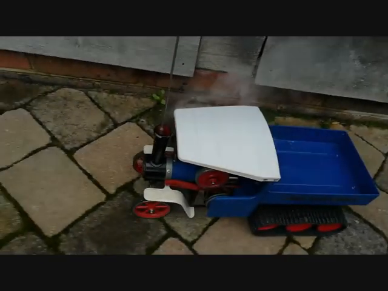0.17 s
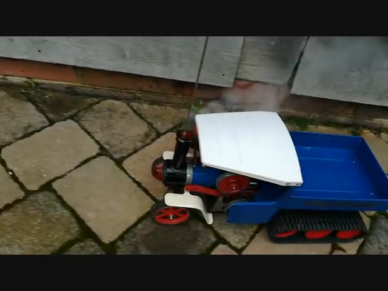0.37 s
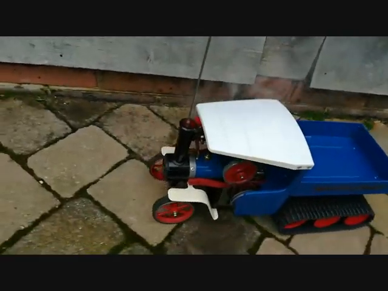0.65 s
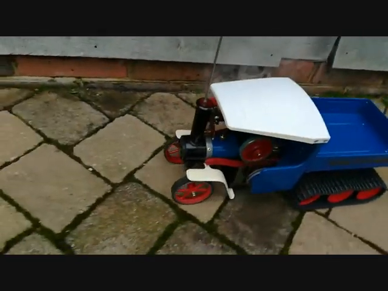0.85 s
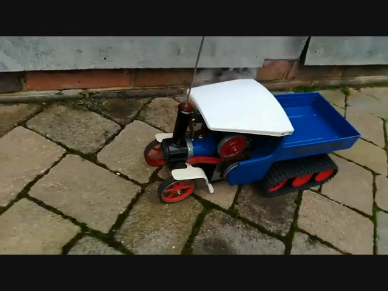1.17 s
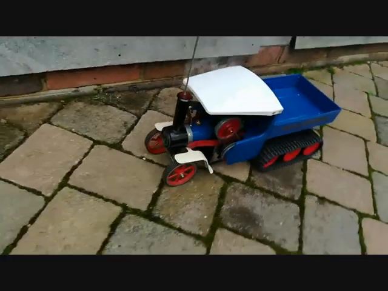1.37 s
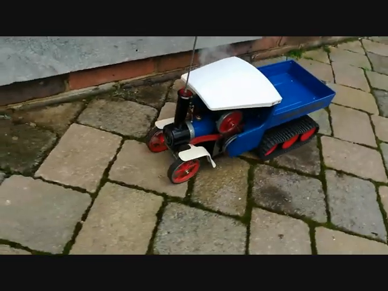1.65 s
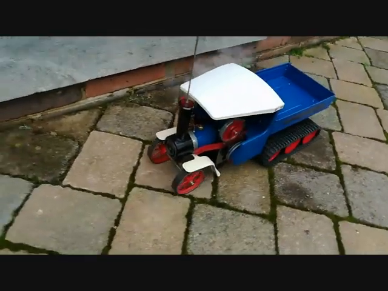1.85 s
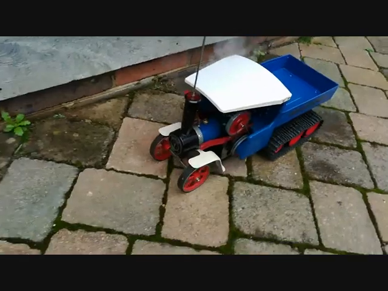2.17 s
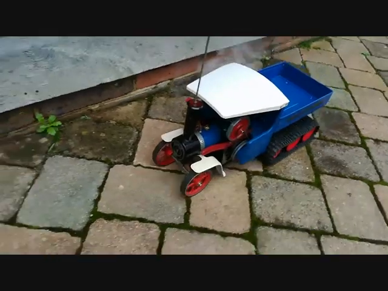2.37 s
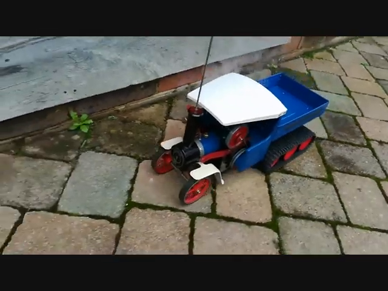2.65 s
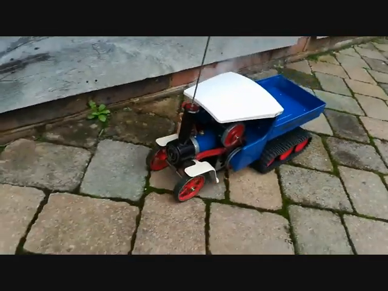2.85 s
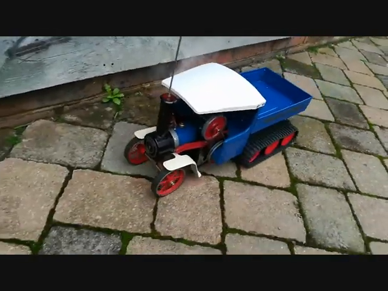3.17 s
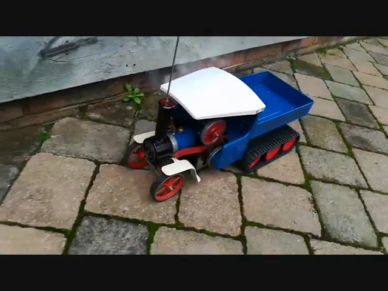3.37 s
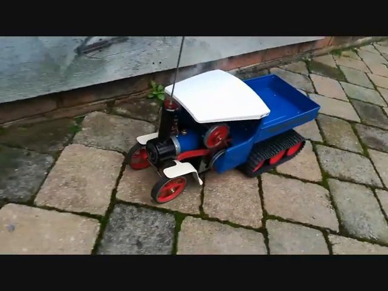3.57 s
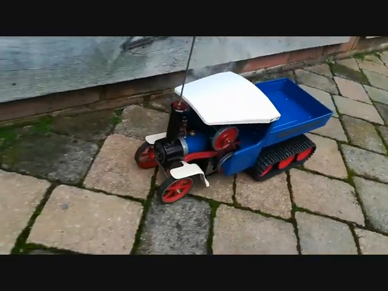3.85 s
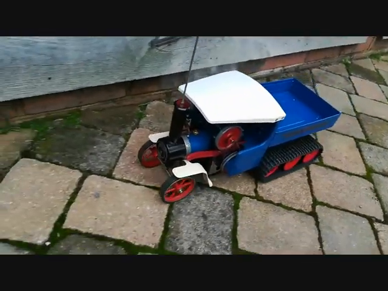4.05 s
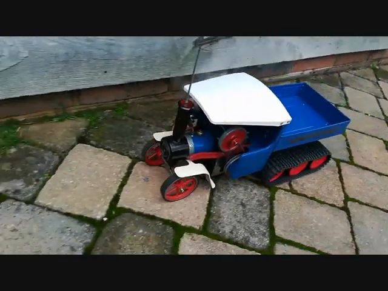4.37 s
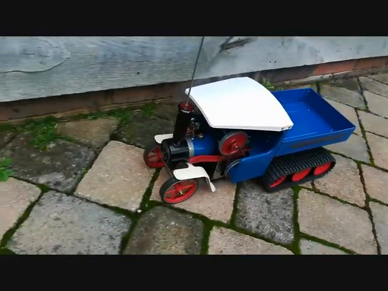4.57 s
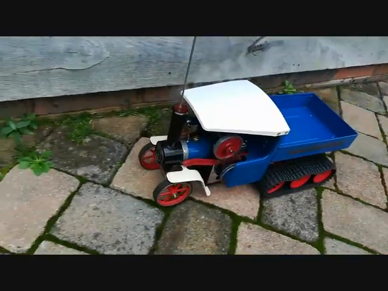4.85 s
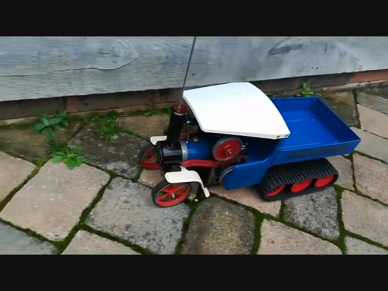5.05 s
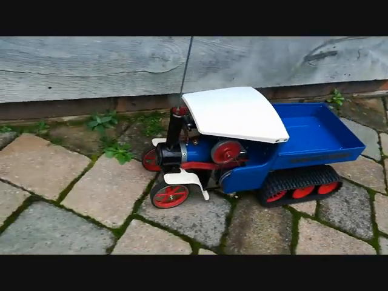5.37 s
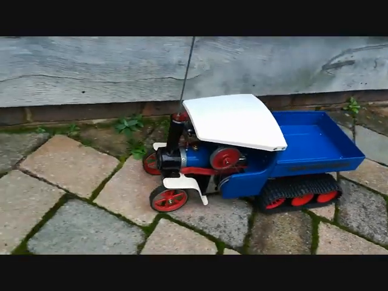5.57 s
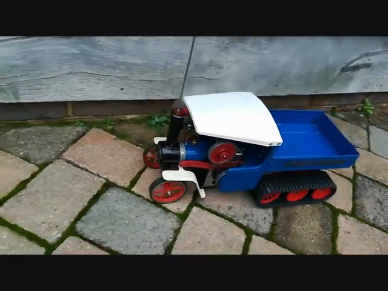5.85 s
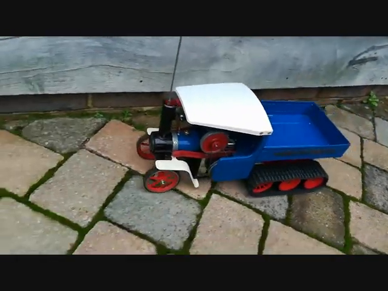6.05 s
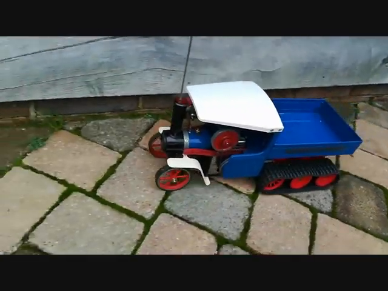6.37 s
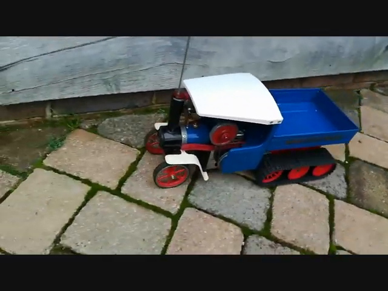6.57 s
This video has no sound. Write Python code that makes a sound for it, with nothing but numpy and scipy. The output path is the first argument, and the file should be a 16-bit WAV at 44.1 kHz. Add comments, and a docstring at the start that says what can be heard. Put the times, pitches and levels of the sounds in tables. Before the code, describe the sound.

Rapid sputtering steam puffs from a toy steam lorry, with thin sheet-metal rattle and leaking hiss, fading in then running steadily.

```python
"""On paving stones beside a wall, a model steam lorry crawls a step from a two-port phone microphone.
Once a turn the exhaust chuffs as noise bursts through chimney resonances; the valve ticks just before.
The piston knocks the sheet-metal frame, played as bursts into ringing modes; the return stroke puffs weakly.
Gears and tracks rattle as rough noise through that frame, leaking steam hisses and the chassis throbs.
The scene fades in over about two and a half seconds."""
import sys
import numpy as np
from scipy import signal
from scipy.fft import rfft, irfft, next_fast_len
from scipy.io import wavfile
from scipy.ndimage import uniform_filter1d

SR = 44100
rng = np.random.default_rng(int(sys.argv[2]) if len(sys.argv) > 2 else 0)


def generate_wav(sig):
    """Save sig (samples, or channels by samples) to the path in sys.argv[1] as 16-bit PCM at SR."""
    pcm = np.round(np.clip(np.atleast_2d(sig).T, -1, 1) * 32767).astype(np.int16)
    wavfile.write(sys.argv[1], SR, pcm)


N = 295911
TIME = np.arange(N) / SR


def undb(db):
    """Amplitude gain for a level in dB."""
    return 10 ** (np.asarray(db) / 20)


def unit(x):
    """Scale to an RMS of 1."""
    return x / np.sqrt(np.mean(x ** 2))


def colour(x, table, share=1):
    """Filter by (Hz, dB) points joined on a log frequency axis; share scales the dB."""
    hz, db = np.transpose(table)
    size = next_fast_len(N)
    bin_hz = np.maximum(np.arange(size // 2 + 1) * SR / size, 1)
    gain = undb(share * np.interp(np.log(bin_hz), np.log(hz), db))
    return irfft(rfft(x, size) * gain, size)[..., :N]


def pair(alike):
    """Left and right noise whose likeness follows (Hz, share) points."""
    hz, share = np.transpose(alike)
    share = np.clip(share, 0, 0.99)
    mid, side = rng.standard_normal((2, N))
    mid = colour(mid, np.transpose([hz, 10 * np.log10((1 + share) / 2)]))
    side = colour(side, np.transpose([hz, 10 * np.log10((1 - share) / 2)]))
    return np.array([mid + side, mid - side])


def walk(rate):
    """Random levels held 1 / rate s and slewed; spread near 1."""
    hold = int(SR / rate)
    steps = np.repeat(rng.standard_normal(N // hold + 1), hold)
    return 1.113 * uniform_filter1d(steps, hold)[:N]


def bursts(s, db, rise_ms, fall_ms, shut=1):
    """Envelope of bursts that swell smoothly and die away; shut over 1 ends them abruptly."""
    out = np.zeros(N + SR)
    t_ms = np.arange(SR // 12) * 1000 / SR
    for at, gain, rise, fall in np.broadcast(s, undb(db), rise_ms, fall_ms):
        start = max(int(at * SR), 0)
        swell = (1 - np.exp(-t_ms / rise)) ** 2
        out[start:start + len(t_ms)] += gain * swell * np.exp(-(t_ms / fall) ** shut)
    return out[:N]


def ring(x, hz, width_hz):
    """One resonance, gain 1 at its centre."""
    return signal.lfilter(*signal.iirpeak(hz, hz / width_hz, SR), x)


FADE_S, FADE_LEAD_S, FADE_POWER = 2.45, 0.034, 0.57


def fade_db(s):
    """The fade-in: gain rises as a power of time, with a small head start."""
    return 20 * FADE_POWER * np.log10(np.clip((s + FADE_LEAD_S) / FADE_S, 1e-3, 1))


def turn_count(s):
    """Crank position in turns, running evenly from each stroke to the next."""
    return np.interp(TIME, s, np.arange(len(s)))


# Crank throb. Each row: multiple of the turn rate, level in dB.
THROB = [(2, -13), (3, -2), (4, -17), (5, 1.5), (6, -7.5), (7, -3), (11, -18), (12, -6.5)]
# Colour of the distant roar. Each row: frequency in Hz, level in dB per Hz.
ROAR_COLOUR = [(18, -27), (28, -5), (42, 1), (110, -8), (220, -16), (330, 0.5), (425, -11), (835, -7.5),
               (1170, -30), (2000, -60)]


def rumble(s):
    """Push and pull of the piston shake the chassis in opposite ways, so odd multiples lead; a roar lies under."""
    angle = 2 * np.pi * turn_count(s)
    shake = 0
    for k, db in THROB:
        # odd multiples sit at their own point of the turn
        phase = k * (angle + 0.56) + 2.3 if k % 2 else k * angle + 0.6
        shake = shake + undb(db + 0.48 * walk(3.98)) * np.cos(phase)
    roar = colour(pair([(40, 1.0), (400, 0.45)]), ROAR_COLOUR)
    return undb(-50 + fade_db(TIME)) * unit(shake) + undb(-51 + fade_db(TIME)) * unit(roar)


# Colour of the leaking steam. Each row: frequency in Hz, level in dB per Hz.
LEAK_COLOUR = [(1500, -6.5), (2500, 6), (3300, 8), (3900, -2), (4500, 6), (5200, 9), (6600, 4), (7890, 7),
               (8660, -5.5), (11300, -1.5), (12500, -20), (16000, -42)]


def leak(leak_db):
    """Steam leaking at the glands is near-independent left and right noise; low and high hiss flicker apart."""
    hiss = unit(colour(pair([(1000, 0.029)]), LEAK_COLOUR))
    low = colour(hiss, [(7500, 0), (9000, -40)])
    high = hiss - low
    flicker = undb(2.0 * walk(60)) * low + undb(3.1 * walk(30)) * high
    return undb(leak_db + 2.9 * walk(40)) * flicker


# Parts that never stop ringing: chassis, chassis, boiler.
# Each row: frequency in Hz, pitch waver in Hz, level in dB on top of its part's ringing.
SINGING_TONES = [(367.7, 4.53, 1.5), (622, 4.95, -5.5), (1251, 8.01, 0)]
# How strongly they ring on. Each row: time in seconds, chassis level in dB, boiler level in dB.
RINGING_LEVELS = [(0.0, -79, -62), (0.22, -55, -47), (0.37, -66, -50), (1.0, -60, -54), (1.3, -64, -44),
                  (1.98, -59.5, -49.5), (2.69, -77, -60), (2.89, -63, -40), (3.17, -58, -68),
                  (3.23, -55, -41), (3.43, -77, -46), (3.47, -58, -54.5), (4.79, -58.5, -43.5),
                  (5.32, -59, -45), (5.39, -49, -38), (5.95, -62, -44.5), (6.01, -55, -47),
                  (6.12, -49, -55), (6.38, -63, -36.5), (6.44, -56, -42), (6.66, -67, -60), (6.7, -55, -54)]


def singing():
    """Chassis and boiler are kept ringing from stroke to stroke: sines wavering in pitch and level."""
    at, chassis_db, boiler_db = np.transpose(RINGING_LEVELS)
    out = 0
    for (hz, waver_hz, db), part_db in zip(SINGING_TONES, (chassis_db, chassis_db, boiler_db)):
        phase = 2 * np.pi * np.cumsum(hz + waver_hz * walk(40)) / SR
        level_db = np.interp(TIME, at, part_db) + db + 2.5 * walk(35)
        out = out + undb(level_db) * np.sin(phase)
    return out


# How the parts face the microphone: chassis, boiler, canopy, mudguard.
# Each row: level side-on in dB, change at full swing in dB, change at the start in dB, slow wander in dB.
PART_LEVELS = [(5, -4, 9, -2), (-0.5, 0, 5, -1.5), (-3, 9, 3, 1), (0.5, -12, -6, 2.5)]
SWING_S, SWING_WIDTH_S = 2.92, 1.24  # time of full swing and its spread
SET_OFF_S = 0.25  # decay of the opening balance


def facing():
    """The lorry swings towards the microphone and back, and sets off with its low rings standing out."""
    swing = np.exp(-((TIME - SWING_S) / SWING_WIDTH_S) ** 2)
    set_off = np.exp(-TIME / SET_OFF_S)
    return [db + swing_db * swing + start_db * set_off + wander_db * walk(3.09)
            for db, swing_db, start_db, wander_db in PART_LEVELS]


# Broad response of the sheet metal. Each row: frequency in Hz, level in dB per Hz.
PANEL_RESPONSE = [(150, -13.5), (300, -10.5), (450, -16), (800, -10.5), (950, -1), (1600, 1), (2300, 3),
                  (3000, -4), (4000, -1.5), (6000, -31)]
# Ringing modes, one list per part (chassis, boiler, canopy, mudguard).
# Each row: frequency in Hz, width in Hz, level in dB within its part.
FRAME_MODES = [
    [(362, 2.9, -19), (616.4, 11, -12)],
    [(1102, 20, 0), (1248.4, 29.6, 5.5)],
    [(944.5, 20, -2.5), (1011, 46, -3.5), (1437, 38, -12), (1611, 59, 0), (1900, 40, -9)],
    [(2167, 7.9, 2), (2280, 48, -1), (2280, 29, -21), (2878, 95, 3)],
]
BLOW_SCATTER_DB = 3


def frame(blows, parts_db):
    """The frame answers with a broad panel response and its parts' ringing modes; no two blows land alike."""
    out = undb(-2.0) * colour(blows, PANEL_RESPONSE)
    for modes, part_db in zip(FRAME_MODES, parts_db):
        part = 0
        for hz, width_hz, db in modes:
            uneven = undb(db + BLOW_SCATTER_DB * walk(22))
            part = part + ring(uneven * blows, hz, width_hz)
        out = out + undb(part_db) * part
    return out / np.std(colour(rng.standard_normal(N), PANEL_RESPONSE))


def thumps(s):
    """The valve gear thumps with each tick and chuff: a steady push plus a rough low-frequency part."""
    tick_s = np.transpose(VALVE_TICKS)[0]
    thump = bursts(tick_s - 0.0003, -33.5 + fade_db(tick_s), 1.5, 2.5, shut=2.1)
    thump = thump + bursts(s - 0.001, -32 + fade_db(s), 1.1, 2.13, shut=2.14)
    push_and_rough = 0.65 + pair([(300, 1.0)])
    return colour(thump * push_and_rough, [(80, -15), (200, 10), (400, 6.0), (800, -18)])


# Likeness of the left and right blows. Each row: frequency in Hz, share from 0 to 1.
BLOW_LIKENESS = [(300, 0.72), (1000, 0.82), (1300, 0.9), (1600, 0.46), (2100, 0.18), (2800, 0.11)]


def works(s, knock_db, rattle_db):
    """Piston knocks, loose clacks and gear rattle strike the frame; thumps and ringing parts join them."""
    clack_s, _, clack_db = np.transpose(LOOSE_CLACKS)
    # slack bearings chatter: a knock is a cluster of separate taps
    chatter = undb(2.85 * walk(700))
    knock = bursts(s - 0.0005, knock_db + 0.5, 0.98, 7.47)
    knock_tail = bursts(s, knock_db - 10.5, 6.2, 22.0)
    clack = bursts(clack_s, clack_db, 3.9, 3.5)
    # gear teeth and track links: dense small blows of very uneven size
    rattle = undb(rattle_db + 3.0 * walk(300) + 2.46 * walk(25))
    blows = (chatter * (knock + knock_tail + clack) + rattle) * pair(BLOW_LIKENESS)
    return frame(blows, facing()) + thumps(s) + singing()


# Colour of the exhaust. Each row: frequency in Hz, level in dB per Hz.
CHUFF_COLOUR = [(500, -10.5), (1000, -10.5), (2500, -17), (3400, -6), (4000, -15.5), (5200, -1.5),
                (7800, -2), (8700, -10), (11400, -10), (16500, -31)]
# Resonances of the jet in the chimney. Each row: frequency in Hz, width in Hz, level in dB.
CHIMNEY_MODES = [(4390, 460, 6.5), (5270, 890, -6), (5960, 1100, -1), (6630, 120, 2), (7230, 1200, -3.5),
                 (9350, 230, -0.5), (10180, 540, -1), (12290, 2200, 2.5)]
SNAPS_PER_S, SNAP_DB = 1200, 9  # drops in the jet, sized against the hiss
STIR_DB = 3.5  # scatter of each resonance from stroke to stroke


def jet(s, puffs, pan_db):
    """Sputtering steam through the chimney; every stroke stirs its resonances anew."""
    drops = rng.random((2, N)) < SNAPS_PER_S / SR
    snaps = drops * undb(SNAP_DB) * rng.choice([-1, 1], N)
    # droplets make it sputter within a millisecond
    sputter = undb(0.95 * walk(900) + np.array([pan_db, -pan_db]) / 2)
    gas = sputter * (pair([(1000, 0.0083)]) + snaps)
    stir_db = STIR_DB * rng.standard_normal((len(s), len(CHIMNEY_MODES))).T
    # the power is shared out differently, its sum stays
    stir_db -= 10 * np.log10(np.mean(undb(2 * stir_db), axis=0))

    def pipe(x):
        """Direct jet plus the chimney resonances."""
        out = undb(-2.5) * x
        for (hz, width_hz, db), stir in zip(CHIMNEY_MODES, stir_db):
            out = out + undb(db + np.interp(TIME, s, stir)) * ring(x, hz, width_hz)
        return colour(out, CHUFF_COLOUR)
    return pipe(puffs * gas) / np.std(pipe(gas[0]))


# Valve ticks just before each chuff. Each row: start in seconds, level in dB.
VALVE_TICKS = [(0.0425, -49), (0.0928, -43), (0.1444, -39), (0.192, -37), (0.244, -37), (0.293, -40),
               (0.3426, -34.5), (0.3912, -36.0), (0.4391, -41), (0.4877, -35), (0.536, -37), (0.587, -41.5),
               (0.634, -34), (0.6848, -51), (0.7334, -46), (0.782, -29), (0.834, -37), (0.8857, -35.5),
               (0.9363, -39), (0.9891, -42), (1.0418, -28), (1.0932, -42), (1.1456, -42), (1.199, -35),
               (1.2567, -45), (1.31, -48), (1.3663, -39), (1.4256, -27), (1.475, -29), (1.5392, -35),
               (1.5947, -30), (1.6485, -34.0), (1.703, -29), (1.7565, -24), (1.8104, -29), (1.861, -35.5),
               (1.9106, -23), (1.9655, -22), (2.0153, -31.0), (2.0688, -33), (2.1214, -36), (2.1748, -21.5),
               (2.2294, -34.0), (2.28, -30.5), (2.332, -32), (2.3828, -31), (2.436, -30), (2.4879, -27),
               (2.537, -23), (2.5875, -46), (2.638, -39), (2.6901, -29), (2.7427, -35), (2.7945, -40),
               (2.847, -29), (2.899, -23), (2.9444, -35), (3.0024, -33), (3.055, -30), (3.104, -24),
               (3.153, -29), (3.2002, -30), (3.25, -32), (3.299, -32), (3.351, -46), (3.401, -36),
               (3.452, -36), (3.5032, -40), (3.5545, -27), (3.606, -29), (3.6559, -28), (3.7047, -21),
               (3.755, -26), (3.8033, -27), (3.8527, -35), (3.9025, -32), (3.9568, -28), (4.0053, -31),
               (4.0584, -25), (4.1133, -28), (4.164, -32), (4.2169, -31), (4.271, -28), (4.3244, -25),
               (4.3733, -24), (4.4234, -26), (4.4704, -34), (4.5222, -27), (4.5634, -31), (4.614, -21.5),
               (4.6635, -31), (4.721, -32), (4.772, -41), (4.8244, -32.5), (4.8761, -35), (4.9276, -40),
               (4.975, -32), (5.028, -25), (5.0795, -32), (5.1281, -45), (5.1828, -28), (5.2326, -34.0),
               (5.284, -22), (5.328, -27), (5.3823, -35.0), (5.4318, -56), (5.4829, -27), (5.5377, -45),
               (5.588, -20), (5.6354, -30), (5.69, -29), (5.737, -26), (5.787, -28), (5.8368, -27),
               (5.882, -47), (5.9345, -28), (5.9876, -44), (6.0415, -43), (6.0944, -40), (6.1437, -28),
               (6.1956, -40), (6.2425, -27), (6.302, -30), (6.353, -32), (6.4068, -25), (6.4573, -43),
               (6.51, -51), (6.5646, -42), (6.6167, -40), (6.6702, -43)]
# Loose parts clacking between strokes.
# Each row: start in seconds, level in the jet in dB, level in the frame in dB.
LOOSE_CLACKS = [(1.12, -24, -30), (1.2264, -26, -34), (1.286, -25, -28), (1.6144, -23, -32),
                (2.0974, -24, -31), (2.6684, -22, -27), (2.878, -19.5, -23), (3.379, -26, -32),
                (4.0415, -18.5, -25), (4.1008, -19.5, -28), (4.5573, -21.5, -33), (4.5914, -23, -27),
                (4.6514, -23, -28), (5.512, -24, -32), (6.226, -21, -27), (6.5944, -26, -29)]
# Colour of the tick against the jet. Each row: frequency in Hz, level in dB.
TICK_COLOUR = [(2500, 4), (3600, 9.5), (5000, -1.5), (9000, -1), (12000, -3.5)]


def steam(s, chuff_db, stretch, back_db, pan_db):
    """Exhaust chuffs cut off by the closing port, a hissing tail, valve ticks, clacks and return puffs."""
    tick_s, tick_db = np.transpose(VALVE_TICKS)
    clack_s, clack_db, _ = np.transpose(LOOSE_CLACKS)
    blast = bursts(s - 0.0015, chuff_db + 3.0, 2.4752 * stretch, 4.75748 * stretch, shut=1.47)
    tail = bursts(s, chuff_db - 23.5, 4.9, 19.3)
    # return puffs fall unevenly, on average 0.4 of a turn later
    back_s = s + (0.4 + 0.086 * rng.standard_normal(len(s))) * np.gradient(s)
    back = bursts(back_s, back_db, 1.6, 7.1, shut=1.07)
    clack = bursts(clack_s, clack_db + 0.1, 0.91, 2.3)
    valve = bursts(tick_s, tick_db + 4.5, 1.2, 4.66, shut=1.4)
    puffs = np.array([blast + tail + back + clack, valve])[:, None]
    strokes, ticks = jet(s, puffs, pan_db)
    return strokes + colour(ticks, TICK_COLOUR)


def brighten(x, s, treble_db):
    """Each stroke has more or less top end."""
    low = colour(x, [(8000, 0), (9500, -40)])
    return low + undb(np.interp(TIME, s + 0.003, treble_db)) * (x - low)


# One row a crank turn, levels with the fade already in them.
# Each row: start in seconds, chuff level in dB, knock level in dB, chuff treble level in dB.
CRANK_TURNS = [(0.0034, -34, -47, -44.5), (0.0535, -30.5, -39.5, -42), (0.104, -28.5, -46, -41),
               (0.156, -27, -40.5, -37), (0.2055, -25, -36.5, -38), (0.2543, -25, -40, -33.5),
               (0.3037, -22, -35.5, -33.5), (0.3532, -22.5, -35, -34.5), (0.4026, -26, -35, -37),
               (0.45, -19.5, -40, -31), (0.4987, -21.5, -35, -33), (0.546, -22, -34, -32.5),
               (0.596, -20, -34.5, -30), (0.645, -18.5, -35, -26.5), (0.6946, -19, -33.5, -30),
               (0.7452, -17.5, -32.5, -33), (0.796, -19, -34, -36), (0.8458, -17, -26, -32.5),
               (0.896, -17, -33, -29.5), (0.948, -16.5, -30.5, -33), (1.0001, -16, -29, -35),
               (1.051, -17.5, -31, -33.5), (1.104, -15.5, -28, -29.5), (1.158, -14, -30, -28.5),
               (1.211, -15, -31.5, -34), (1.268, -16.5, -27, -30), (1.3215, -16.5, -33, -28),
               (1.379, -16, -29, -28.5), (1.4375, -15.5, -26, -27.5), (1.494, -13, -27, -31.5),
               (1.5505, -14.5, -28.5, -28), (1.6057, -14, -29, -28.5), (1.6595, -11.5, -25.5, -26),
               (1.714, -14.5, -26, -26), (1.768, -12.5, -25, -27.5), (1.821, -14, -25, -27),
               (1.8737, -14.5, -27, -29.5), (1.9245, -16, -25, -29.5), (1.9764, -15.5, -26.5, -29),
               (2.0278, -14.5, -26.5, -27), (2.08, -12, -25.5, -28.5), (2.135, -12.5, -25.5, -25),
               (2.1881, -13, -28, -25.5), (2.239, -14, -27, -27), (2.2923, -15.5, -28, -31),
               (2.3432, -13, -28, -27), (2.395, -13, -28.5, -28), (2.445, -12.5, -27.5, -28.5),
               (2.4975, -14, -26, -29), (2.5476, -14.5, -26.5, -29), (2.5989, -10, -25.5, -26),
               (2.65, -11.5, -27, -27), (2.7016, -12.5, -23, -25), (2.7544, -12, -26, -25),
               (2.806, -13, -24.5, -31), (2.858, -15, -23.5, -28), (2.9085, -12, -22.5, -28),
               (2.963, -11.5, -25.5, -25), (3.014, -12, -29, -22.5), (3.067, -13.5, -25, -31),
               (3.115, -12.5, -26.5, -30.5), (3.164, -12, -29, -26), (3.211, -11.5, -30, -26),
               (3.261, -12, -25.5, -23), (3.311, -12, -31, -23), (3.36, -11.5, -28, -23),
               (3.4124, -13, -26.5, -24), (3.4636, -12, -26, -22.5), (3.5147, -11.5, -29, -24.5),
               (3.5675, -12.5, -23, -25.5), (3.616, -13, -26, -26), (3.667, -13.5, -26, -28.5),
               (3.716, -15, -27, -31), (3.765, -12, -28, -28), (3.814, -12, -23, -26.5),
               (3.8634, -13.5, -29, -28), (3.9144, -14, -23, -23.5), (3.9655, -13, -28, -25),
               (4.0182, -12.5, -28.5, -21.5), (4.0699, -14, -23, -26.5), (4.122, -13, -29, -23.5),
               (4.1747, -16, -27.5, -27), (4.2288, -12, -25.5, -22), (4.283, -14.5, -26, -26.5),
               (4.3345, -11.5, -25, -26.5), (4.3848, -11, -23.5, -23), (4.434, -12, -24.5, -26),
               (4.4826, -13, -26, -26.5), (4.532, -11, -22, -27), (4.5807, -11.5, -23.5, -23),
               (4.631, -11.5, -23.5, -26), (4.6818, -14, -21.5, -23), (4.732, -13, -32, -27),
               (4.784, -11.5, -28, -26), (4.8353, -12.5, -22, -26), (4.8858, -12, -27.5, -23.5),
               (4.936, -15, -24.5, -21.5), (4.9871, -14.5, -27, -25), (5.041, -12.5, -25, -22),
               (5.092, -14, -27.5, -23.5), (5.1434, -13.5, -26, -22), (5.1946, -14, -28.5, -27.5),
               (5.243, -12.5, -28, -30), (5.295, -12, -28, -27.5), (5.3427, -11.5, -26, -24),
               (5.394, -11.5, -27.5, -21), (5.445, -12, -22, -25), (5.4961, -12.5, -24.5, -25),
               (5.5491, -12, -27.5, -23.5), (5.6002, -13, -25, -26.5), (5.65, -12, -24.5, -26),
               (5.7008, -11, -26, -26), (5.7494, -11.5, -30, -24.5), (5.797, -13.5, -24.5, -26),
               (5.8465, -10.5, -28, -23.5), (5.896, -12, -26, -24), (5.947, -11.5, -26.5, -22.5),
               (6.001, -13.5, -23.5, -31.5), (6.0516, -12, -24.5, -29), (6.103, -12.5, -28, -25),
               (6.1544, -10.5, -27, -25.5), (6.2062, -13.5, -29, -25.5), (6.2584, -14, -24.5, -24),
               (6.313, -15.5, -24.5, -24), (6.3658, -12.5, -26, -25.5), (6.417, -13.5, -24, -26),
               (6.469, -13, -34, -26.5), (6.5218, -11.5, -28.5, -24), (6.576, -13, -26.5, -29),
               (6.6283, -12, -25.5, -26), (6.682, -14.5, -27, -26.5)]
FULL_CHUFF_DB, LENGTH_PER_DB = -15.5, -0.06  # reference chuff; log of length per dB below it
USUAL_TREBLE_DB = -15  # treble against the peak for a chuff of the plain jet colour
LEAK_DIP_DB, LEAK_DIP_TURN = 1.5, 0.69  # pressure swing either way; weakest point of the turn


def scene():
    """The crank turns drive every layer."""
    s, chuff_db, knock_db, treble_db = np.transpose(CRANK_TURNS)
    fade = fade_db(TIME)
    # a weaker chuff is shorter, a stronger one longer
    stretch = np.exp(LENGTH_PER_DB * (FULL_CHUFF_DB + fade_db(s) - chuff_db))
    # return puffs are uneven from turn to turn
    back_db = -31 + fade_db(s) + np.clip(rng.standard_normal(len(s)), -3, 1.2)
    puffs = steam(s, chuff_db, stretch, back_db, 0.96 * walk(4.4))
    puffs = brighten(puffs, s, treble_db - chuff_db - USUAL_TREBLE_DB)
    # the leak follows the cylinder pressure, the rattle slightly
    pressure_db = -LEAK_DIP_DB * np.cos(2 * np.pi * (turn_count(s) - LEAK_DIP_TURN))
    hiss = leak(-37.5 + fade + pressure_db + 1.5 * walk(5.9))
    metal = works(s, knock_db, -41 + fade + 0.27 * pressure_db)
    return rumble(s) + hiss + metal + puffs


# Drift of the lorry across the microphone. Each row: time in seconds, left minus right in dB.
LORRY_DRIFT = [(0, -2.5), (1, -1.1), (2, -0.7), (3, -0.5), (4, -1), (5, -0.4), (6, -0.2), (6.7, -0.5)]
# Tone of the two ports. Each row: frequency in Hz, left minus right in dB.
PORT_TONE = [(60, 0), (200, 0.5), (700, -4), (2400, -4), (4400, 2.5), (8100, -5), (11000, -10),
             (15000, -2.5)]
# Treble colour: dip near 13.7 kHz, bump near 14.8 kHz, steep fall. Each row: frequency in Hz, level in dB.
TREBLE_COLOUR = [(40, 0), (11800, 0), (13700, -11), (14800, 3), (15200, 1), (15900, -22), (16500, -28)]
TOP_HZ = 16500


def record(dry):
    """The lorry drifts between two ports of unlike tone; the treble dips, lifts and falls, and the top is cut."""
    drift_db = np.interp(TIME, *np.transpose(LORRY_DRIFT))
    left, right = dry * undb(np.array([drift_db, -drift_db]) / 2)
    ports = np.array([colour(left, PORT_TONE, share=0.5), colour(right, PORT_TONE, share=-0.5)])
    top_cut = signal.ellip(8, 0.2, 70, TOP_HZ, fs=SR, output="sos")
    return signal.sosfilt(top_cut, colour(ports, TREBLE_COLOUR))


dry = scene()
out = record(dry)
generate_wav(out)
```